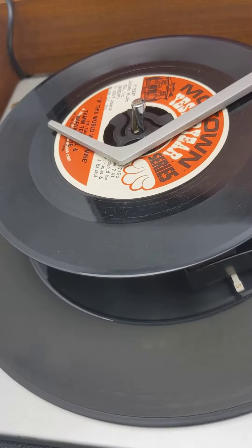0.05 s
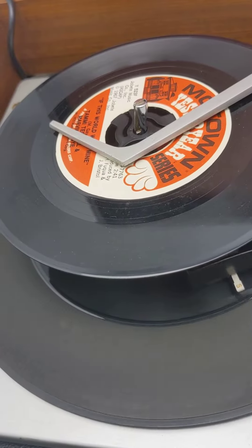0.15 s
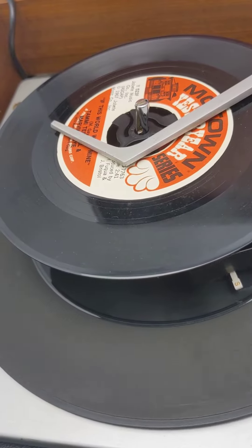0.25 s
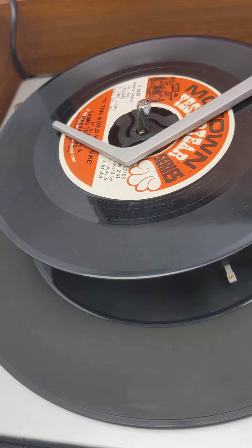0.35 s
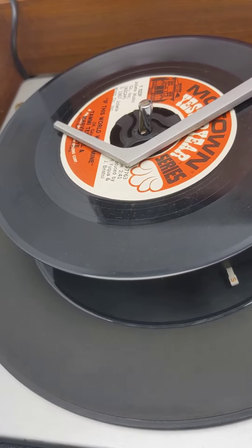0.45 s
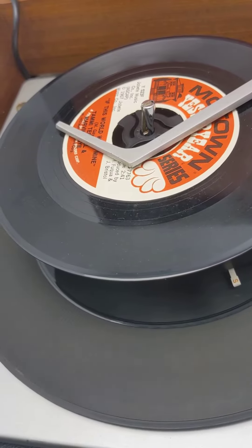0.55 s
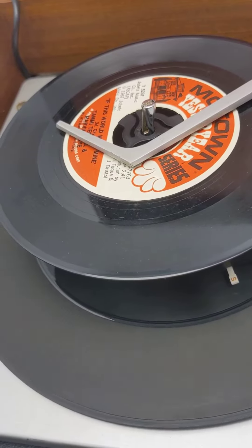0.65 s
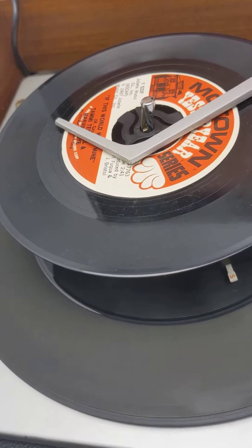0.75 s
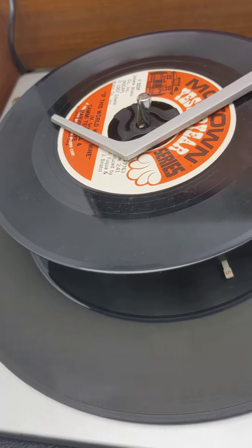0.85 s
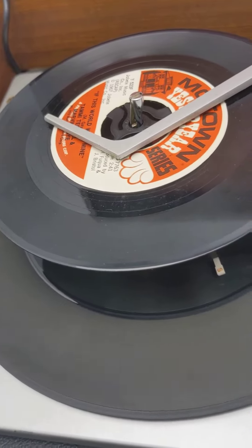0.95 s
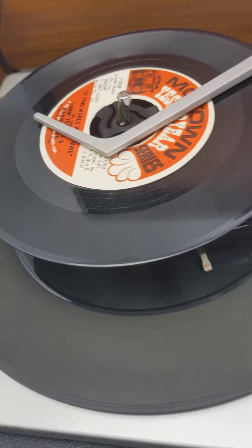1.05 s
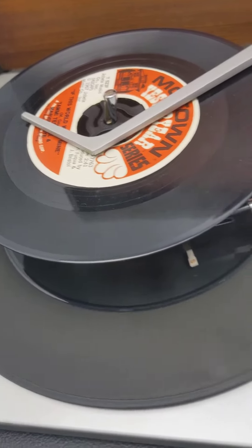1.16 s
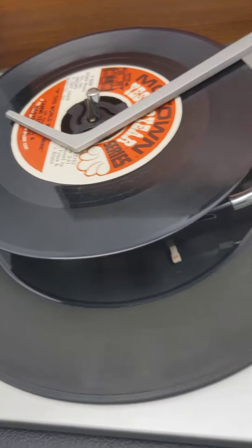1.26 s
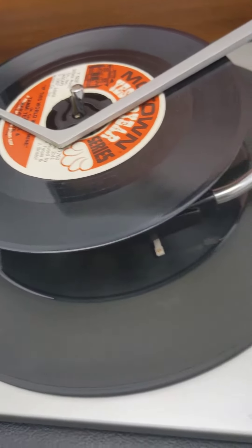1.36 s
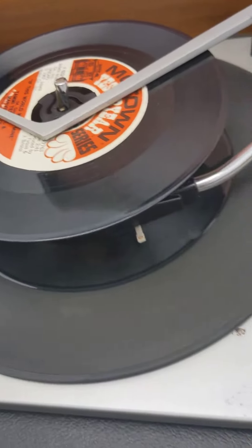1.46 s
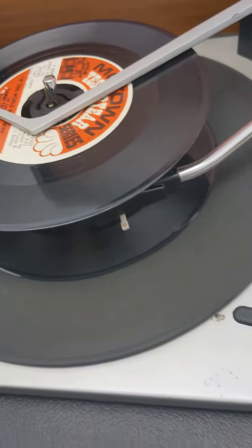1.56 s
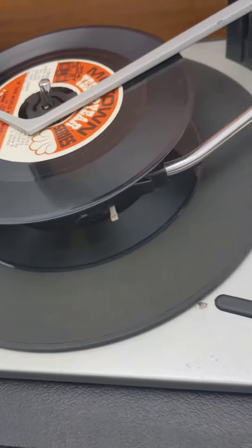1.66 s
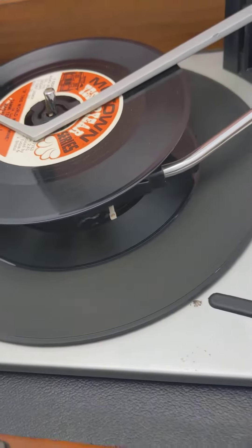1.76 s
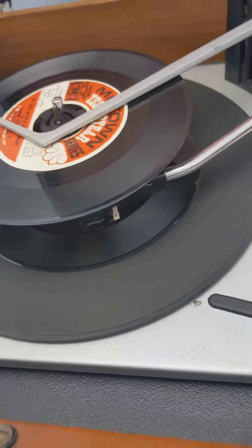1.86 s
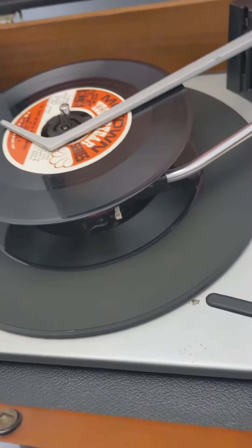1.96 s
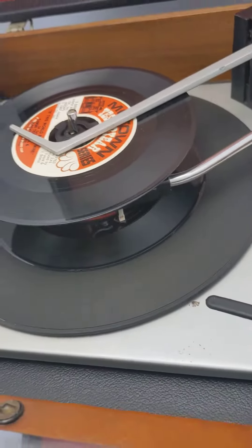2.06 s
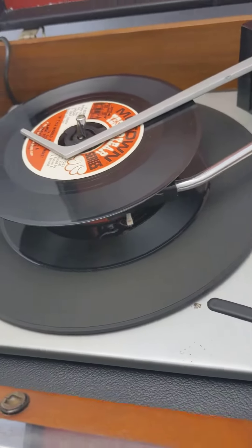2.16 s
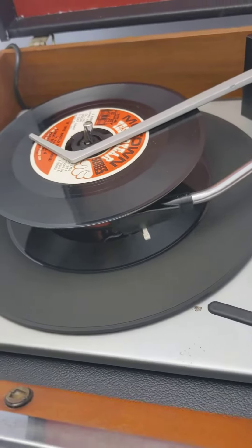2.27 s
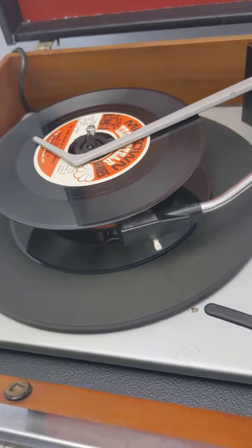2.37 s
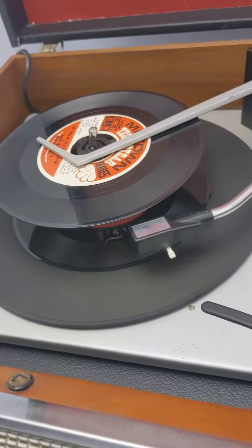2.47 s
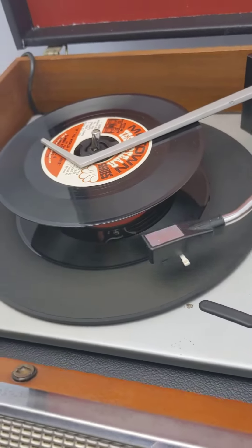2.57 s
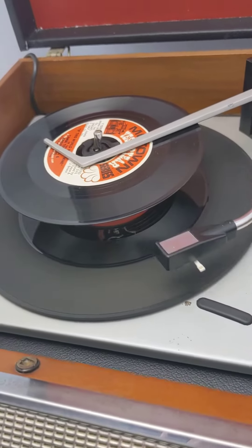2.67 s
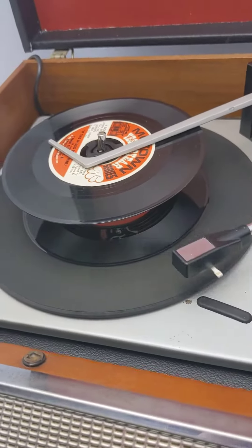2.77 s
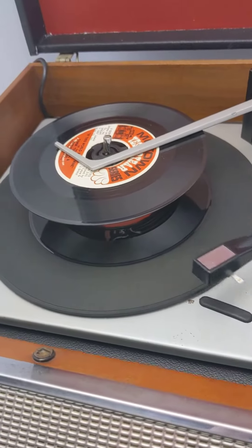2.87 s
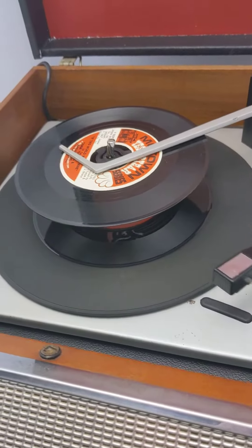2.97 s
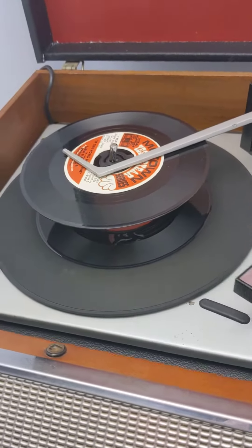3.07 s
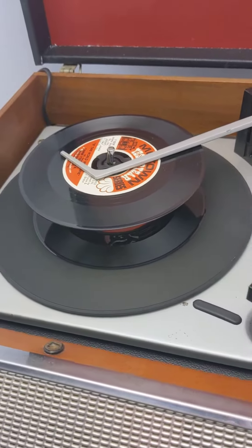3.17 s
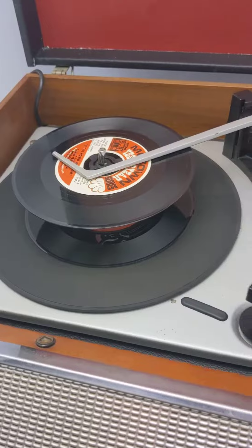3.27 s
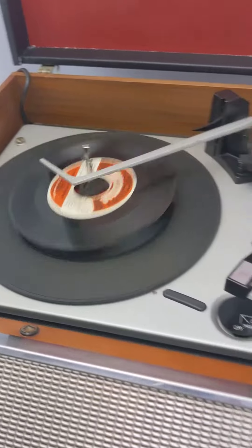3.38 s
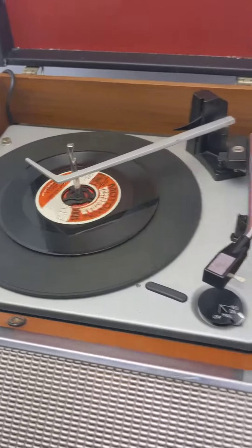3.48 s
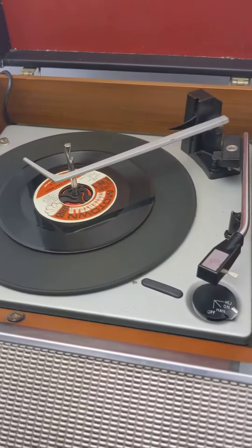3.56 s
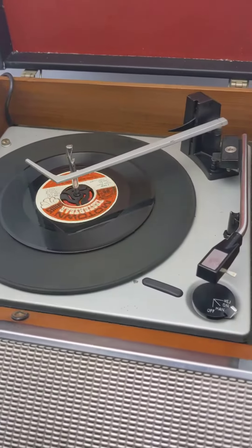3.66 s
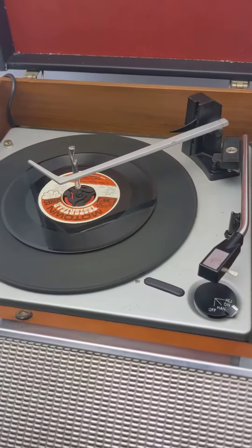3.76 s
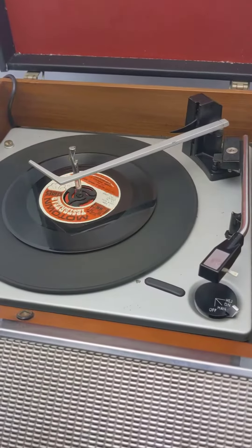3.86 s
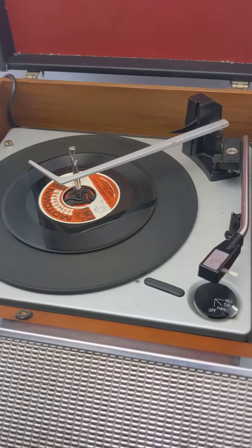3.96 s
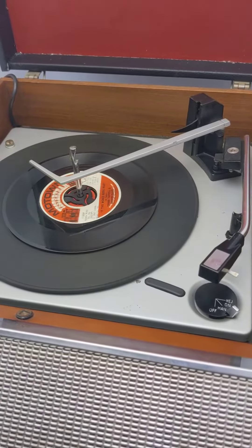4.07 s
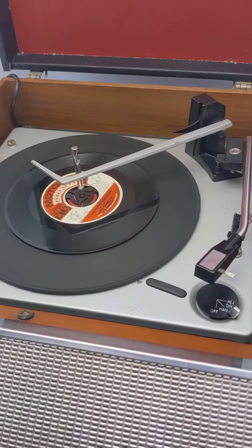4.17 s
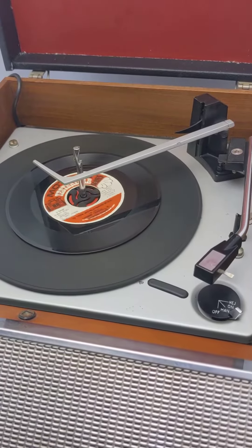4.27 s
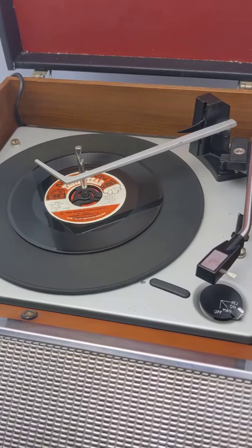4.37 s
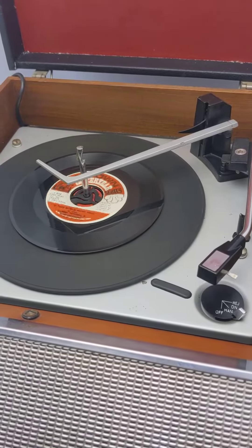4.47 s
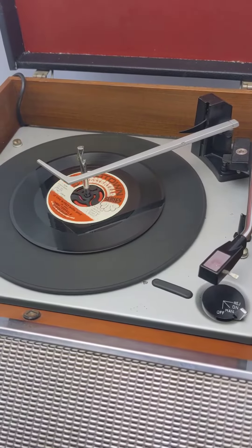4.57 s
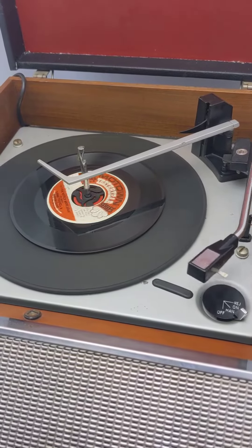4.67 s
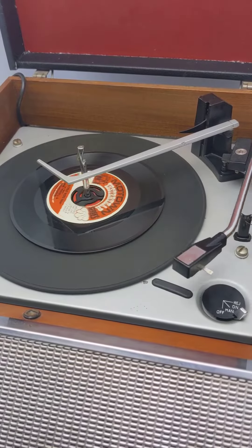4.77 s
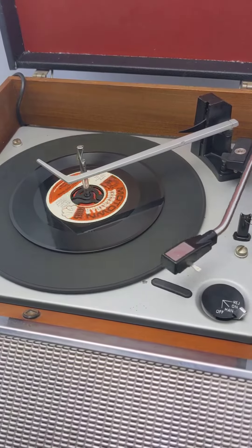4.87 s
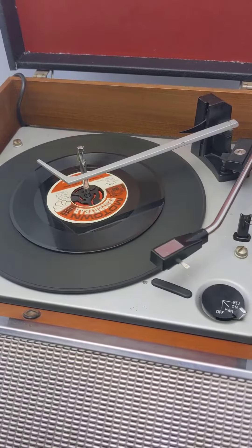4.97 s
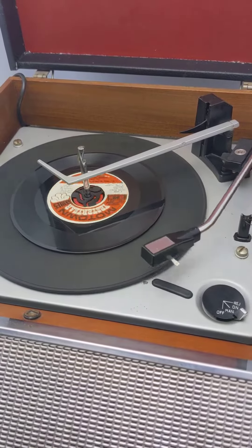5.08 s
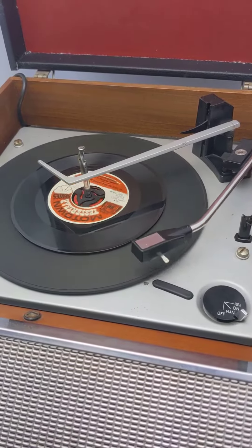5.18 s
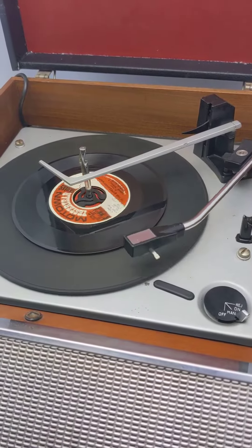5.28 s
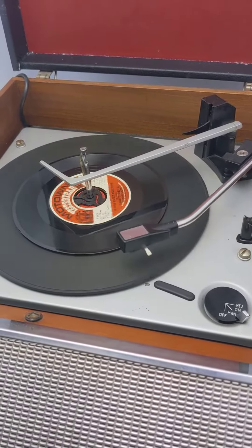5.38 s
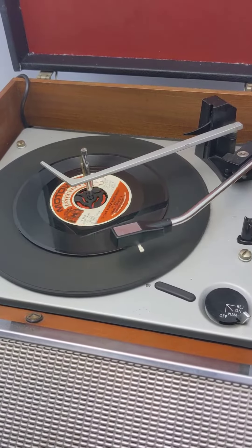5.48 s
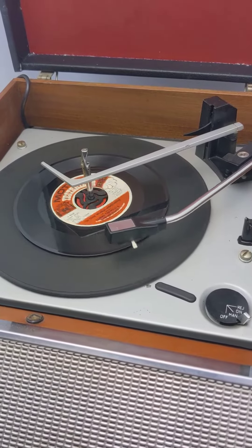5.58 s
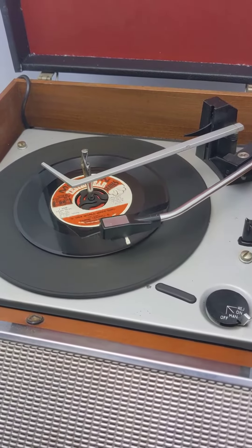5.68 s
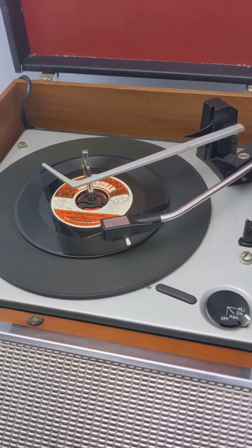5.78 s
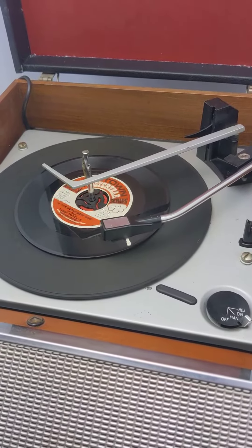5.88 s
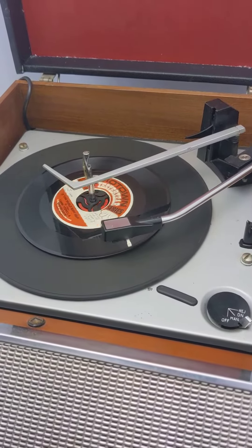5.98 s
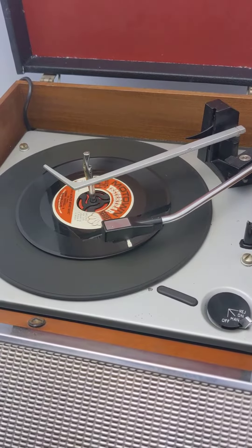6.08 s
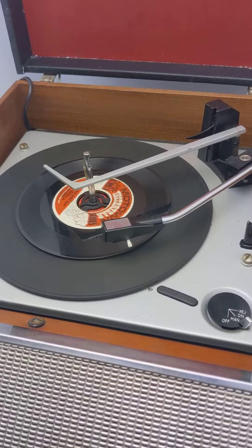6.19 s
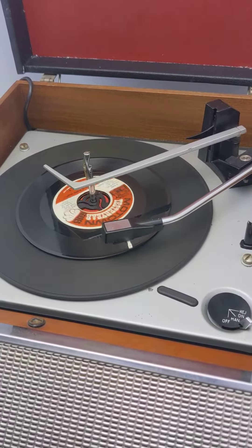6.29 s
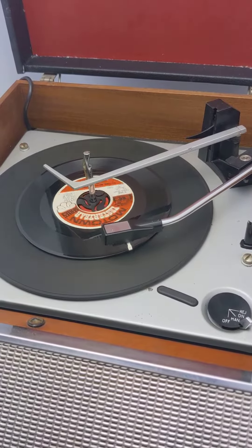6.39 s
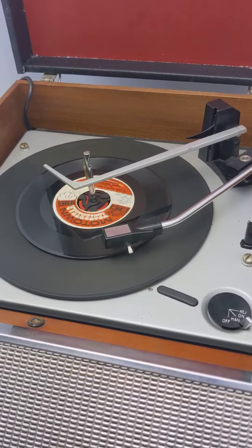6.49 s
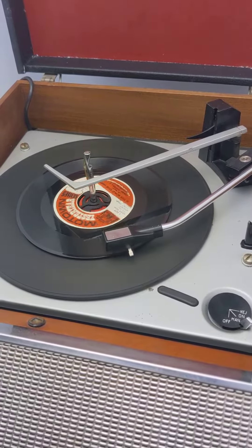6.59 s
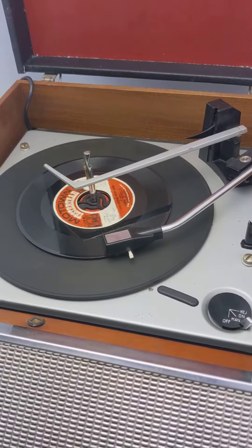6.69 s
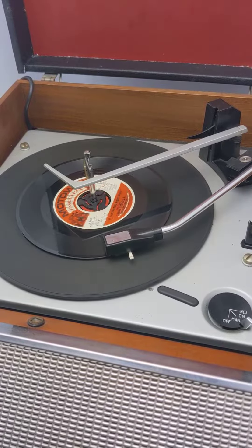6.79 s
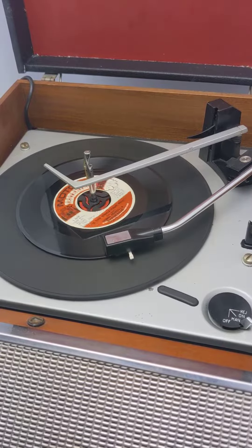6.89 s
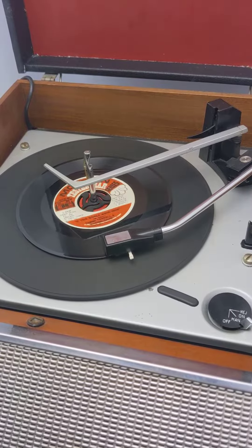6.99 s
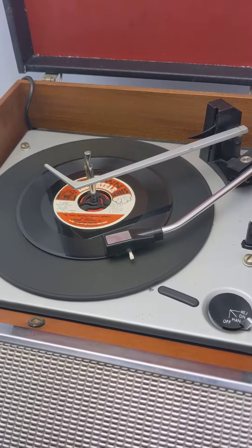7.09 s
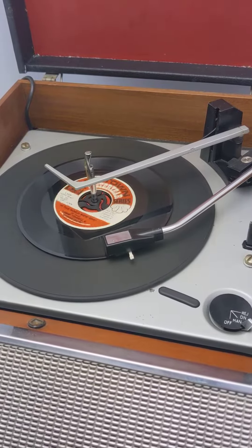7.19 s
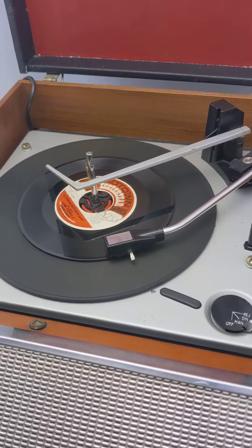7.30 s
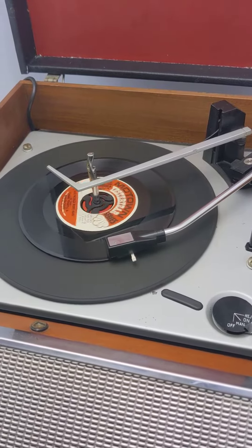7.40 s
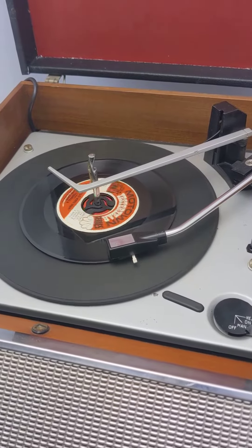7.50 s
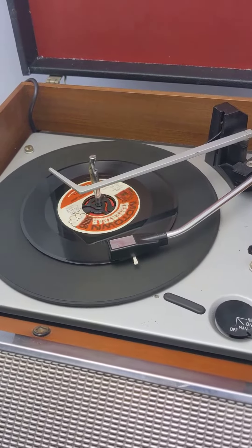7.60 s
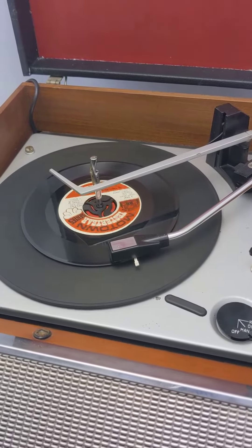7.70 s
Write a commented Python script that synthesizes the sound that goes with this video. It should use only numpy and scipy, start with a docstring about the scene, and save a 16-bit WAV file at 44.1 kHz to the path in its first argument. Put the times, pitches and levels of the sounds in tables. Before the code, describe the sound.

A portable record changer runs through its cycle, heard close in a small room on a handheld stereo microphone that leans in, then draws back. Faint mains hum and motor whirr continue throughout. At about 0.5 s a cluster of sharp, boomy pops bursts from the loudspeaker, followed by scratchy groove noise and further thumps at 0.7, 1.0 and 1.4 s. Grainy cam friction grows, with small clicks at 2.3 and 2.5 s. From 3.3 s levers tick, then at 3.4-3.55 s the disc drops in a loud, dense metallic clatter. A rub and clack come at 4.2 s, lighter ticks to 4.7, a faint squeak at 5.3-5.7, a click at 5.75 and a hard double clack at 6.34 s. At 6.8 s the stylus lands with hiss and rumble; bright clacks at 7.1 and 7.25 s precede a booming pop at 7.28 and a faint, dying spring hum.

```python
"""Indoors, close to a portable record changer in mid-cycle, on a handheld stereo microphone.
Furthest down lie mains hum (sines) and motor whirr (coloured noise), set by the microphone's distance.
Over them cams and sliding parts rub (grainy noise), and the arm squeaks and hums (sines).
The live pickup sends thumps and groove noise to the loudspeaker (rung cone, sine cabinet modes, noise).
Nearest, levers clack and a disc drops on the metal deck (noise bursts ringing resonances)."""
import sys
import numpy as np
from scipy import signal
from scipy.fft import rfft, irfft, next_fast_len
from scipy.io import wavfile
from scipy.ndimage import uniform_filter1d

SR = 44100
rng = np.random.default_rng(int(sys.argv[2]) if len(sys.argv) > 2 else 0)


def file_out(sig):
    """Save sig as 16-bit WAV at sys.argv[1]."""
    # one column per channel
    cols = np.atleast_2d(sig).T
    # limit, then scale
    lim = np.clip(cols, -1, 1)
    pcm = np.round(lim * 32767).astype(np.int16)
    wavfile.write(sys.argv[1], SR, pcm)


N = 341438
TIME = np.arange(N) / SR  # [s]

# likeness of left and right noise: (frequency [Hz], correlation [-1 to 1])
LIKENESS = [(60, -0.35), (180, 0.82), (550, 0.83), (1650, 0.13), (4970, -0.088), (15000, 0.17)]

# the microphone leans over the deck, then draws back:
# (time [s], whirr level [dB], hum gain [dB], power share of the close whirr colour [0-1])
MICROPHONE_DISTANCE = [(0, -57, -4.5, 0.91), (.5, -50, -1.5, 1), (1.6, -53, 3.5, 1), (2.5, -50, -0.6, 0.34),
                       (3.0, -54, -1.5, .08), (5.0, -54.5, -2, 0.21), (7.74, -53, -1, 0)]
# relative spectrum of motor and room air, microphone drawn back: (frequency [Hz], level [dB per Hz])
WHIRR_FAR = [(24, -63.5), (40, -6), (204, -5), (354, -9.5), (402, -19), (444, -12), (680, -21.5),
             (950, -19.5), (1340, -19.5), (1590, -27), (2150, -18), (2770, -19.5), (11600, -35),
             (16000, -74)]
# the same with the microphone over the deck: (frequency [Hz], level [dB per Hz])
WHIRR_NEAR = [(24, -45), (40, -2), (204, -5.5), (249, -26.5), (312, -7), (392, -26.5), (516, -16),
              (1550, -41), (2100, -21), (3740, -31.5), (11600, -47), (16000, -61)]
# resonances that whirr and groove hiss pass through: (frequency [Hz], width [Hz], level [dB])
STEADY_PEAKS = [(1160, 600, 7), (1824, 70, 7.5), (2147, 23, 9), (2570, 70, -15.5), (4220, 71, -13.5),
                (4430, 83, 3.5), (5500, 160, 4), (8000, 150, 3), (11800, 150, 5)]
MAINS_HZ = 50
# levels of successive mains multiples ahead of the hum gain; the last is not sounded: (level [dB])
HUM_LEVELS = [-71, -64.5, -55.5, -52.5, -60, -60.5, -63]

# relative spectrum of cams and arm sliding: (frequency [Hz], level [dB per Hz])
RUB_SPECTRUM = [(2350, -33.5), (4000, -2), (4320, 1.5), (4840, -5), (9680, -8), (11600, -6), (15100, -12),
                (16200, -28.5), (16500, -61.5)]
# steady friction of the turning cam: (time [s], level [dB])
CAM_LEVEL = [(0, -81), (.45, -73.5), (1.1, -64), (2.1, -65.5), (2.55, -57.5), (3.3, -62.5), (3.9, -67),
             (5.0, -79.5), (6.8, -68.5), (7.1, -57.5), (7.74, -57.5)]
# parts slide over one another: (start [s], length [s], level [dB], level change while sliding [dB/s])
SLIDE_EVENTS = [(1.797, 0.019, -61, -3), (1.86, .065, -57.5, 5), (2.133, 0.3, -52, -4),
                (3.39, .17, -44, -72), (4.06, .35, -53, -32), (6.187, .27, -69.5, 30)]
# resonance of the sliding parts: (frequency [Hz], width [Hz], level [dB])
SLIDE_RESONANCE = [(9370, 3500, 7.5)]
SLIDE_IN, SLIDE_OUT = 0.28, 0.35  # rise and fall, as shares of the slide's length

# the arm's spring hums after the last latch: (time [s], frequency [Hz], level [dB], t60 [s])
SPRING_TONE = [(7.300, 456, -49, 1.8)]
# the arm pivot squeaks faintly: (time [s], frequency [Hz])
SQUEAK_GLIDE = [(5.325, 3330), (5.39, 3880), (5.44, 3960), (5.555, 3720), (5.605, 4080), (5.67, 3230)]
SQUEAK_DB, SQUEAK_SWELL_DB = -66, 4.5  # level at the start, rise by the end

# jolts of the pickup, heard through the loudspeaker:
# (time [s], crack level [dB], low mids [dB], t60 [s], cabinet boom level [dB])
PICKUP_JOLTS = [(0.536, -14, -6, 0.08, -4.5), (0.5446, -12.5, -34, 0.04, -9),
                (0.549, -10.5, -24, 0.029, -7), (0.5569, -16.5, -35, 0.014, -19),
                (0.686, -37, -10, 0.21, -33.5), (0.7127, -23.5, 5, 0.029, -4),
                (0.9544, -37, -10, 0.034, -26), (0.9623, -31.5, 3.5, 0.12, -19),
                (0.9885, -51, 12, 0.082, -22), (1.0361, -36, -14, 0.06, -34), (1.049, -28.5, 5, 0.051, -24),
                (1.0602, -35.5, 2.5, 0.13, -22.5), (1.094, -43, 5.5, 0.04, -21),
                (1.135, -28, -12, 0.014, -25.5), (1.2357, -33, -32, 0.038, -43),
                (1.309, -44.5, 5, 0.076, -33), (1.3786, -21, 9.5, 0.028, -2.5), (3.885, -65, -8, 0.04, -43),
                (6.805, -52, 14, 0.12, -26.5), (7.28, -12.5, -3, 0.062, -5.5)]
JOLT_TREBLE_DB = -35  # the cone passes little treble
# loudspeaker cone resonances: (frequency [Hz], width [Hz], level [dB])
CONE_RESONANCES = [(458, 90, -2), (953, 126, 4), (1384, 830, -11.5), (1876, 85, 5), (2174, 240, -1.5),
                   (2640, 83, 1), (2900, 200, -3), (4560, 350, 6), (5640, 330, -8)]
# direction of the cone's sound: (frequency [Hz], left minus right [dB])
CONE_BALANCE = [(350, -7), (700, 1), (2400, 3), (4400, 10.5), (8000, 2)]
# cabinet modes: (frequency [Hz], left [dB], right [dB], t60 [s], build-up [s], right lag [s])
CABINET_MODES = [(72.3, -3.5, -5.5, 0.069, 0.011, 0.0063), (99.3, -0.5, -6, 0.048, .011, 0.0043),
                 (139.3, -6.5, 0, 0.096, 0.012, .0015), (290, -4, -4.5, 0.031, 0.00048, 0.00017),
                 (193.4, -5, -2.5, 0.035, .003, .0003), (247, -8, -7.5, 0.036, 0.0017, 0.000093)]
# relative spectrum of groove hiss: (frequency [Hz], level [dB per Hz])
GROOVE_SPECTRUM = [(29, -55), (50, -25), (151, -1), (338, -3.5), (756, -15.5), (1300, -11), (1580, -18),
                   (2190, -5), (2850, -10), (4390, -13), (9000, -32), (11700, -79), (19800, -120)]
# the stylus drags on vinyl, then lifts to a lighter touch:
# (lands [s], lifts [s], hiss [dB], rumble [dB], hiss at the lift's end [dB], rumble there [dB]);
# the two last levels come before the steady fade
STYLUS_DRAGS = [(0.556, 0.953, -59.5, -47, -75, -60), (0.99, 1.385, -53, -40.5, -57, -50),
                (6.8, 7.284, -40.5, -45.5, -53.5, -50.5)]
LAND_S, LIFT_S, AFTER_DB_PER_S = 0.0075, 0.08, -5.5  # AFTER: steady fade from the lift onward

# levers, latches and the falling disc on the deck: (time [s], level [dB], low mids [dB],
# treble [dB], t60 [s], the struck part's own ring [Hz], thud [dB])
DECK_CLACKS = [(0.439, -51, -20, -11, 0.047, 2050, 0), (0.955, -37, -13, -14, 0.054, 4500, -6),
               (0.987, -34, -23, -10.5, 0.044, 2190, 12), (1.1485, -40.5, -6, -2, 0.066, 904, -3),
               (1.238, -40, -23, -19, 0.023, 4400, -15), (1.7145, -61, -2, 16, 0.069, 923, -5),
               (2.3219, -38.5, -19, -5, 0.04, 1100, -9), (2.4543, -29, -1.5, -0.5, 0.063, 1100, -48),
               (2.7239, -45.5, 15, 10, 0.071, 11000, -14), (3.2618, -39.5, 1.5, -13, 0.06, 1860, -27),
               (3.3189, -40, 4, -14, 0.062, 1050, 10.5), (3.3884, -35.5, -7, -18, 0.076, 778, -1),
               (3.4007, -26.5, -5.5, -21, 0.29, 2310, -9), (3.4303, -7, -7.5, -12, 0.14, 2080, -14.5),
               (3.4455, -13, -1, -3, 0.052, 2230, -15), (3.4716, -13.5, -17, -6.5, 0.16, 4560, -35),
               (3.48, -16, 6, 4.5, 0.088, 2960, 3), (3.5122, -26.5, 7, -16, 0.22, 2160, 10),
               (3.5269, -21.5, -6, -10.5, 0.12, 1110, -13), (3.5546, -20, -18.5, -12.5, 0.078, 4500, -4),
               (4.1794, -17.5, -15.5, -25, 0.088, 1900, -31), (4.28, -29, -4, -54, 0.081, 1950, -9),
               (4.369, -47, 12, -28, 0.11, 1126, -3), (4.6967, -42, -14, -14.5, 0.062, 1300, -15),
               (5.7531, -28.5, -1.5, -7, 0.054, 3450, -33), (6.3366, -16, -2, -18.5, 0.11, 5900, -25),
               (6.3443, -7.5, -15, -15.5, 0.058, 2200, -22), (6.8944, -44, 18.5, 14.5, 0.066, 920, -10.5),
               (7.1224, -16.5, -2, 0, 0.076, 11900, -41), (7.2462, -18, 2.5, -2.5, 0.088, 780, -2),
               (7.2579, -16.5, -6, -7.5, 0.049, 1050, 0)]
# sheet-metal deck; widths below 45 Hz count as 45: (frequency [Hz], width [Hz], level [dB])
DECK_RESONANCES = [(1644, 41, 10), (2080, 77, -3), (2880, 79, -14), (3393, 7.7, 0), (4340, 27, -6.5),
                   (4670, 55, -13), (6126, 320, -6), (6660, 440, -8), (7700, 39, -19), (10600, 44, -12.5),
                   (9860, 22, -16), (11400, 34, -9), (11180, 250, -22.5), (12400, 49, -17.5),
                   (11100, 63, -14), (12400, 31, -6.5), (12940, 110, -11.5), (14800, 91, -26)]
DECK_PAN_DB = -2.2  # left minus right: the mechanism sits a little to the right

# the two microphone ports: (frequency [Hz], left minus right [dB])
PORT_BALANCE = [(700, 0.2), (1300, 0), (2400, 0.8), (6000, 0), (13000, 4.5)]
LEAD = 256  # samples of silence before a blow
EDGE_HZ = 16300  # band limit
FULL_SCALE = .97  # ceiling of the rounded peaks
HALVES = np.array([[.5], [-.5]])  # shares a left-minus-right difference between the sides


def amp(db):
    """Amplitude ratio of a level in dB."""
    return 10 ** (np.asarray(db) / 20)


def evened(x):
    """Scales to rms 1."""
    return x / np.sqrt(np.mean(x ** 2) + 1e-20)


def read(points, hz):
    """Reads a table between its points, on a log frequency axis."""
    f, value = np.transpose(points)
    return np.interp(np.log(hz + 1), np.log(f + 1), value)


def curve(rows, column):
    """Reads one column of a timed table along the scene."""
    rows = np.asarray(rows)
    return np.interp(TIME, rows[:, 0], rows[:, column], left=-120, right=rows[-1, column])


def ramp(s, length):
    """Rises from 0 to 1 after time s."""
    return np.clip((TIME - s) / max(length, 1e-4), 0, 1)


def add(mix, s, sound):
    """Lays a sound into the mix at time s."""
    part = mix[:, round(s * SR):][:, :sound.shape[1]]
    part += sound[:, :part.shape[1]]


def humps(peaks, hz):
    """Steady noise stands out at the resonances that it passes through."""
    return 1 + sum(amp(db) / np.sqrt(1 + (2 * (hz - f) / w) ** 4) for f, w, db in peaks)


def resonances(peaks, hz, between_db):
    """Complex response of a body: its resonances, alternating in sign, over a flat part."""
    response = amp(between_db)
    for k, (f, w, db) in enumerate(np.maximum(peaks, (0, 45, -99))):  # at least 45 Hz wide
        response = response + (-1) ** k * amp(db) / (1 + 2j * (hz - f) / w)
    return response


def pair(length):
    """Spectra of left and right noise, whose likeness depends on frequency."""
    hz = np.fft.rfftfreq(length, 1 / SR)
    a, b = rfft(rng.standard_normal((2, length)))
    same = np.clip(read(LIKENESS, hz), -1, 1)
    return hz, np.array([a, same * a + np.sqrt(1 - same ** 2) * b])


def slow_waver(size):
    """Random drift of rms 1, noise smoothed twice over size samples."""
    once = uniform_filter1d(rng.standard_normal(N), size)
    return evened(uniform_filter1d(once, size))


def noise(gain, waver_db, waver_s):
    """Coloured stereo noise, evened to rms 1, then made to waver in level."""
    hz, z = pair(next_fast_len(N))
    waver = slow_waver(max(round(waver_s * SR), 1))
    return evened(irfft(z * gain(hz))[:, :N]) * amp(waver_db * waver)


def blow(tilt, t60, body, rise_s, top_hz, strike):
    """One sharp strike and a dying burst of uneven chatter ring a body."""
    hz, z = pair(16384)
    t = np.maximum(np.arange(16384) - LEAD, 0) / SR
    chatter = amp(3.1 * evened(uniform_filter1d(rng.standard_normal(16384), 60)))
    envelope = amp(-60 * t / max(t60, .004)) * (1 - np.exp(-t / rise_s)) ** 2
    burst = irfft(z) * chatter * envelope
    burst[:, LEAD + 20] += strike
    treble_edge = 1 + (hz / top_hz) ** 16
    out = irfft(rfft(burst) * amp(read(tilt, hz)) * body(hz) / treble_edge)
    # the loudest 3 ms of the 1-5 kHz band set the level
    middle = irfft(rfft(out) * ((hz > 1000) & (hz < 5000)))
    loudest = uniform_filter1d((middle ** 2).mean(0), 130).max()
    return out[:, :12000] / np.sqrt(2 * loudest)


def room(x, t60, wet_db):
    """A short tail of unrelated reflections on each side."""
    t = np.arange(SR // 3) / SR
    tail = rng.standard_normal((2, len(t))) * amp(-60 * t / t60) * (t > .004)
    tail = tail / np.linalg.norm(tail[0])
    return x + amp(wet_db) * signal.fftconvolve(x, tail, axes=1)[:, :N]


def hum():
    """Multiples of the mains frequency, each wavering, with the right side ahead in phase."""
    out = np.zeros((2, N))
    for hz, db in zip(MAINS_HZ * np.arange(1, len(HUM_LEVELS)), HUM_LEVELS):
        waver = slow_waver(3000)
        turn = 2 * np.pi * (hz * TIME + rng.random()) + .3 * np.array([[0], [1]])
        out += np.sqrt(2) * amp(db + 2.0 * waver) * np.sin(turn)
    return out


def motor():
    """Whirr through its resonances, and the hum; both follow the microphone's distance."""
    near = noise(lambda hz: amp(read(WHIRR_NEAR, hz)) * humps(STEADY_PEAKS, hz), 1.0, 0.034)
    far = noise(lambda hz: amp(read(WHIRR_FAR, hz)) * humps(STEADY_PEAKS, hz), 1.0, 0.034)
    share = np.clip(curve(MICROPHONE_DISTANCE, column=3), 0, 1)
    whirr = np.sqrt(share) * near + np.sqrt(1 - share) * far
    whirr_gain = amp(curve(MICROPHONE_DISTANCE, column=1))
    hum_gain = amp(curve(MICROPHONE_DISTANCE, column=2))
    return whirr_gain * whirr + hum_gain * hum()


def rubbing():
    """Bright, grainy friction: the cam all along, and single slides that swell, then fade out."""
    slide_gain = 0
    for s, length, db, slope in SLIDE_EVENTS:
        rise = ramp(s, SLIDE_IN * length)
        fall = 1 - ramp(s + length, SLIDE_OUT * length)
        slide_gain = slide_gain + rise * fall * amp(db + slope * np.clip(TIME - s, 0, length))
    cam_noise = noise(lambda hz: amp(read(RUB_SPECTRUM, hz)), 1.4, 0.0048)
    slide_noise = noise(lambda hz: amp(read(RUB_SPECTRUM, hz)) * humps(SLIDE_RESONANCE, hz), 1.0, 0.005)
    return amp(curve(CAM_LEVEL, column=1)) * cam_noise + slide_gain * slide_noise


def arm():
    """A slowly dying spring tone and a gliding, jittery squeak that is stronger on the left."""
    s, hz, db, t60 = SPRING_TONE[0]
    late = np.maximum(TIME - s, 0)
    spring = amp(db - 60 * late / t60) * np.minimum(late / .02, 1) * np.sin(2 * np.pi * hz * late)
    jitter = 1 + 0.11 * uniform_filter1d(rng.standard_normal(N), 150)
    glide = np.interp(TIME, *np.transpose(SQUEAK_GLIDE)) * jitter
    start, end = SQUEAK_GLIDE[0][0], SQUEAK_GLIDE[-1][0]
    swell = amp(SQUEAK_DB + SQUEAK_SWELL_DB * ramp(start, end - start))
    level = swell * ramp(start, 0.026) * (1 - ramp(end - .015, .02))
    squeak = level * np.sin(2 * np.pi * np.cumsum(glide) / SR)
    # the squeak reaches the right side 5 samples later
    return np.sqrt(2) * np.array([spring + squeak, spring + 0.46 * np.roll(squeak, 5)])


def boom():
    """The cabinet's modes swell and die; the lowest ones build up slowest."""
    t, out = np.arange(SR // 2) / SR, 0
    for hz, left_db, right_db, t60, build, lag in CABINET_MODES:
        late = np.maximum(t - np.array([[0], [lag]]), 0)
        swell = (1 - np.exp(-(late / build) ** 2)) ** 2 * amp(-60 * late / t60)
        mode = swell / swell.max() * np.sin(2 * np.pi * hz * late)
        out = out + amp([[left_db], [right_db]]) * mode
    # too small for deep bass
    return signal.sosfilt(signal.butter(6, 58, "high", fs=SR, output="sos"), out)


def cone(hz):
    """Response of the cone: its resonances, with a balance between the sides that varies with pitch."""
    return resonances(CONE_RESONANCES, hz, -7) * amp(HALVES * read(CONE_BALANCE, hz))


def groove():
    """Hiss and rumble as the stylus lands and drags, then touches more lightly and fades."""
    out = np.zeros((2, N))
    rumble_peaks = [(89, 40, -4.0), (140, 95, 1), (250, 130, -4.0), (305, 36, -0.5)]  # (Hz, width Hz, dB)
    hiss = noise(lambda hz: amp(read(GROOVE_SPECTRUM, hz)) * humps(STEADY_PEAKS, hz) * (hz > 400), 1.5, 0.011)
    rumble = noise(lambda hz: resonances(rumble_peaks, hz, -56.5), 3.6, 0.017)
    for lands, lifts, hiss_db, rumble_db, hiss_after_db, rumble_after_db in STYLUS_DRAGS:
        lifted = ramp(lifts, LIFT_S)
        fade_db = AFTER_DB_PER_S * np.maximum(TIME - lifts, 0)
        hiss_gain = amp(hiss_db + lifted * (hiss_after_db - hiss_db) + fade_db)
        rumble_gain = amp(rumble_db + lifted * (rumble_after_db - rumble_db) + fade_db)
        out += ramp(lands, LAND_S) * (hiss_gain * hiss + rumble_gain * rumble)
    return out


def loudspeaker():
    """Pickup jolts crack the cone and boom the cabinet; the groove noise joins them."""
    out, cabinet = groove(), boom()
    for s, db, low_db, t60, boom_db in PICKUP_JOLTS:
        # the cone falls off steeply in the treble
        tilt = [(80, low_db + 15), (350, low_db + 13), (800, low_db + 8.5), (2200, 4),
                (3600, -10), (5200, -15.5), (7500, JOLT_TREBLE_DB)]
        crack = blow(tilt, t60, cone, 0.00011, 14000, 3.35)
        add(out, s - LEAD / SR, amp(db) * crack)
        add(out, s, amp(boom_db) * cabinet)
    return out


def deck():
    """Clacks ring the struck part, with its own scatter of overtones, and the sheet-metal deck."""
    out = np.zeros((2, N))
    for s, db, low_db, high_db, t60, own_hz, thud_db in DECK_CLACKS:
        place, size = rng.random((2, 40))
        # smaller overtones are louder and narrower: (Hz, width Hz, dB)
        scatter = np.transpose([600 * 24 ** np.sort(place), 35 + 60 * size, 3 - 9 * size])
        parts = [(own_hz, 0.076 * own_hz + 30, 5), *DECK_RESONANCES, *scatter]
        tilt = [(60, thud_db - 20.5), (200, thud_db + 12.5), (650, low_db + 3.5), (2500, 0),
                (5000, 0.44 * high_db), (9000, high_db + 1.5)]
        clack = blow(tilt, t60, lambda hz: resonances(parts, hz, -2.8), .0012, 13800, 1.7)
        add(out, s - .001 - LEAD / SR, amp(db + HALVES * DECK_PAN_DB) * clack)
    return out


def scene():
    """Motor, friction and arm dry; loudspeaker and deck each with a short room tail."""
    background = motor() + rubbing() + arm()
    return background + room(loudspeaker(), 0.28, -25.0) + room(deck(), 0.23, -25.5)


def record(dry):
    """The microphone loses deep bass, its ports differ, high peaks round off; then the band limit."""
    dry = signal.sosfilt(signal.butter(4, 42, "high", fs=SR, output="sos"), dry)
    length = next_fast_len(N)
    ports = amp(HALVES * read(PORT_BALANCE, np.fft.rfftfreq(length, 1 / SR)))
    dry = irfft(rfft(dry, length) * ports, length)[:, :N]
    dry = dry / (1 + (dry / FULL_SCALE) ** 4) ** .25
    band_limit = signal.firwin(511, EDGE_HZ, window=("kaiser", 9), fs=SR)
    return signal.oaconvolve(dry, band_limit[None], "same")


dry = scene()
out = record(dry)
file_out(out)
```